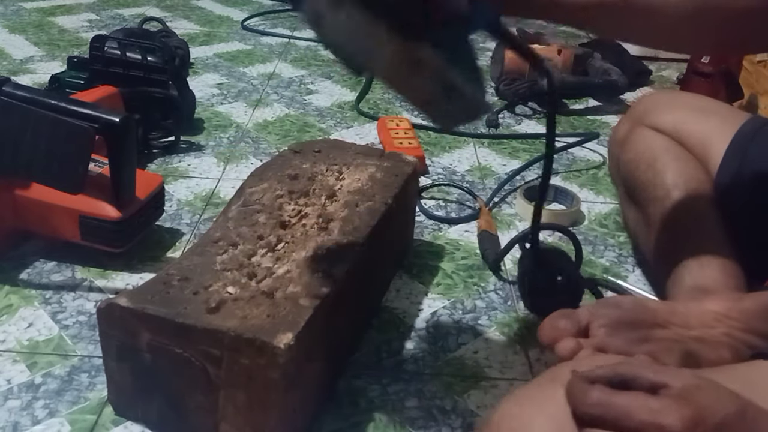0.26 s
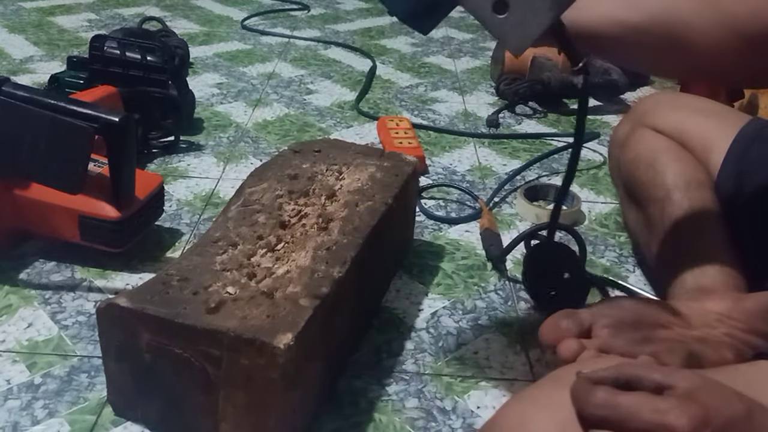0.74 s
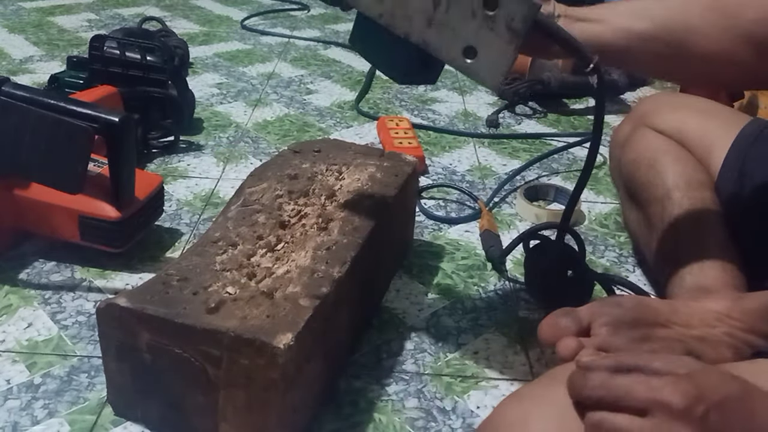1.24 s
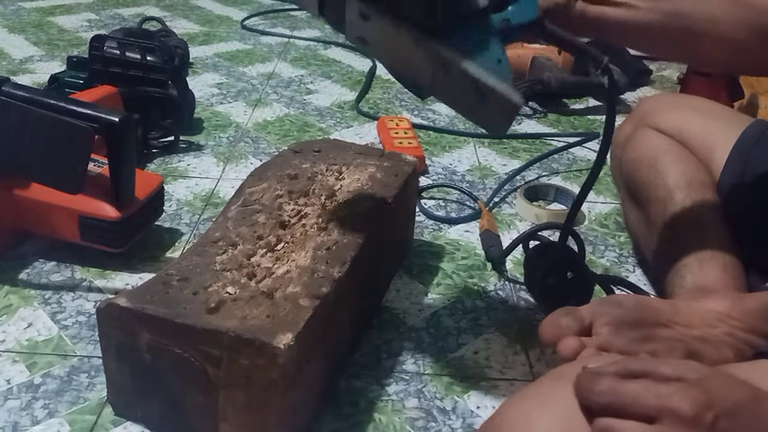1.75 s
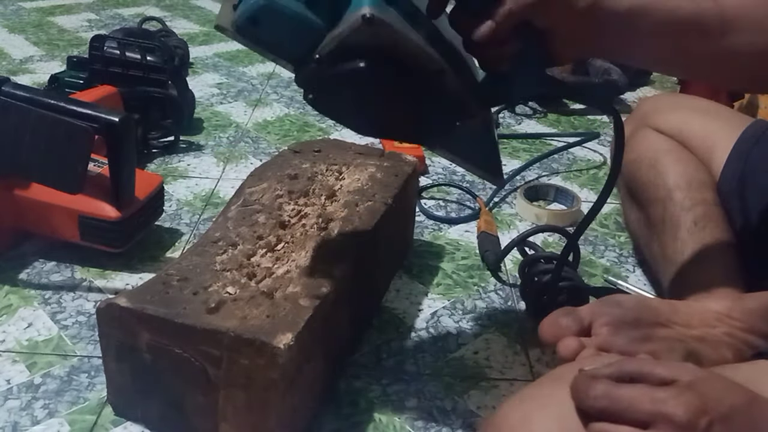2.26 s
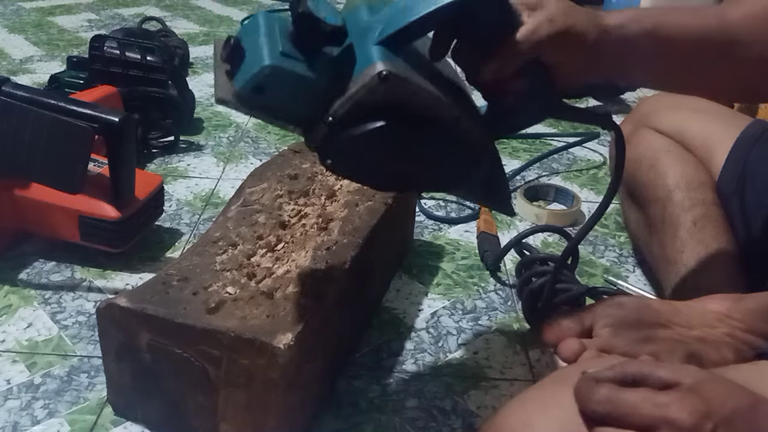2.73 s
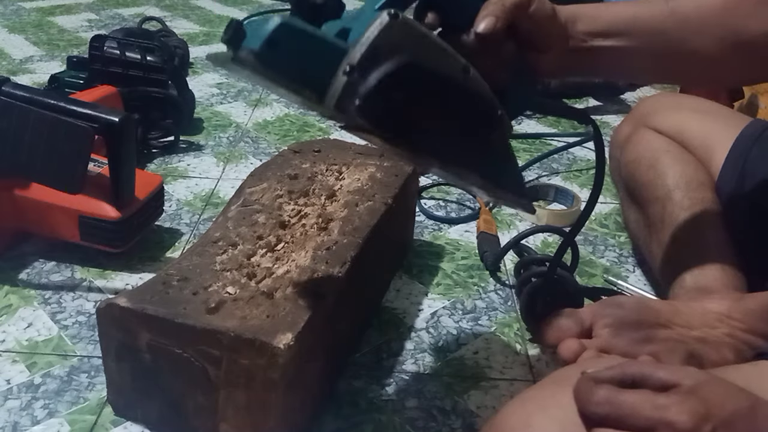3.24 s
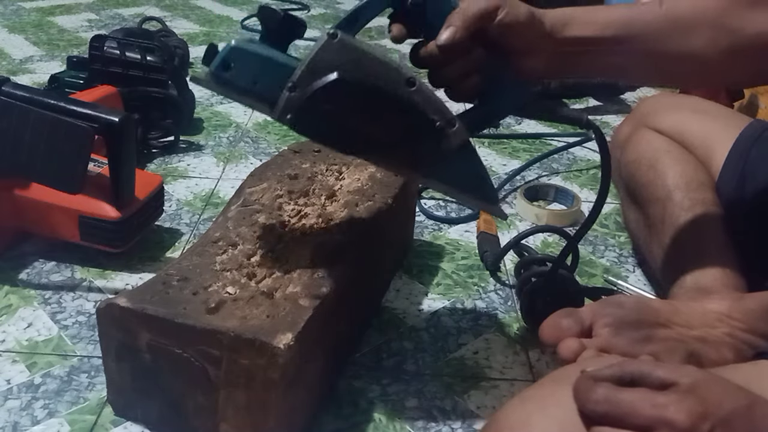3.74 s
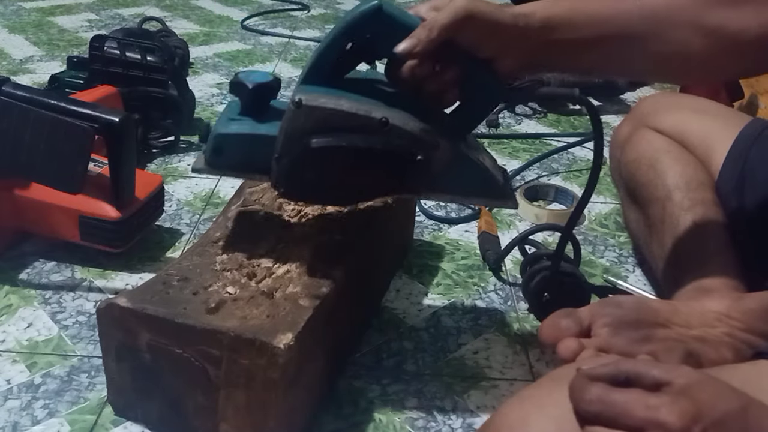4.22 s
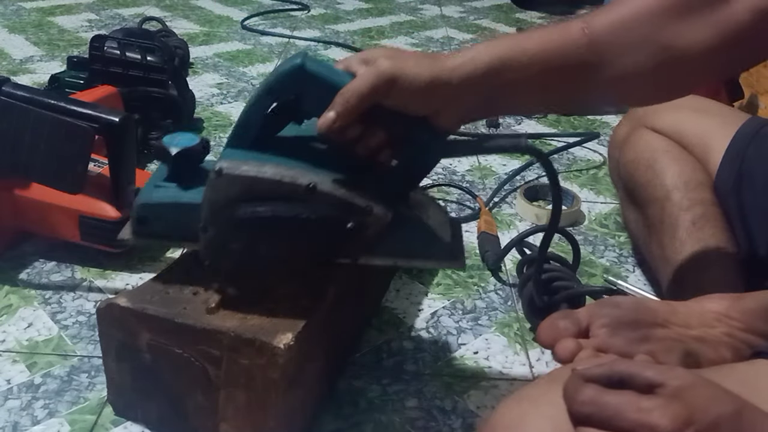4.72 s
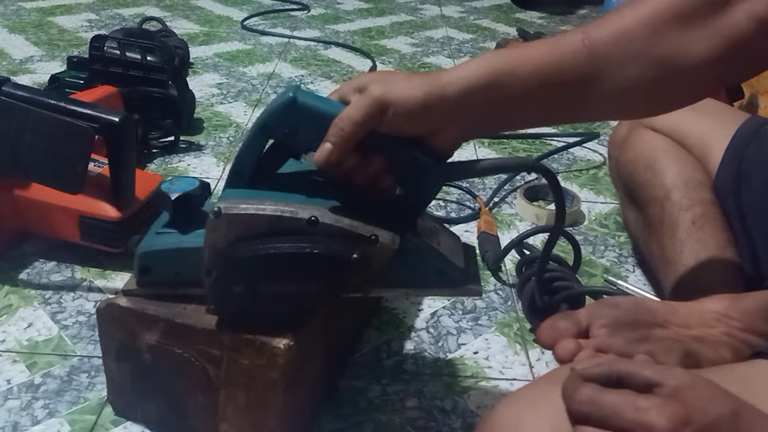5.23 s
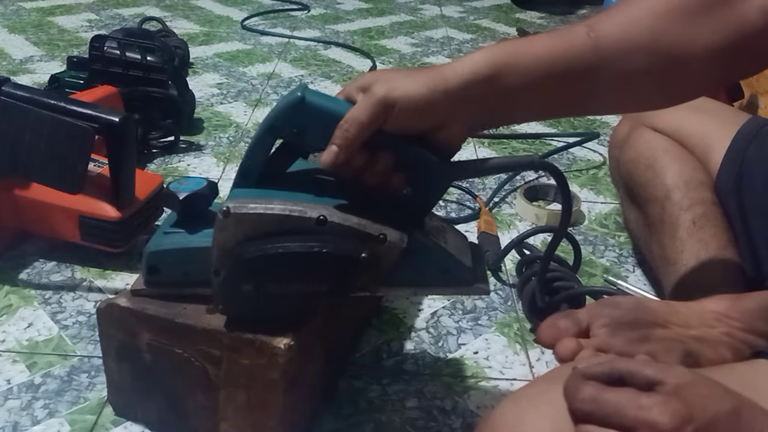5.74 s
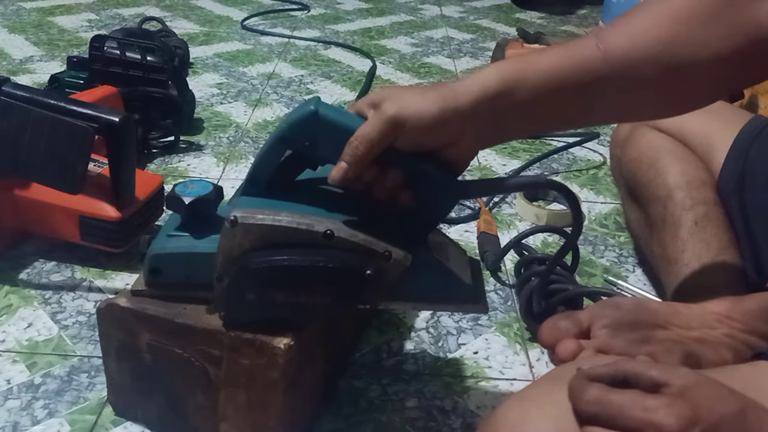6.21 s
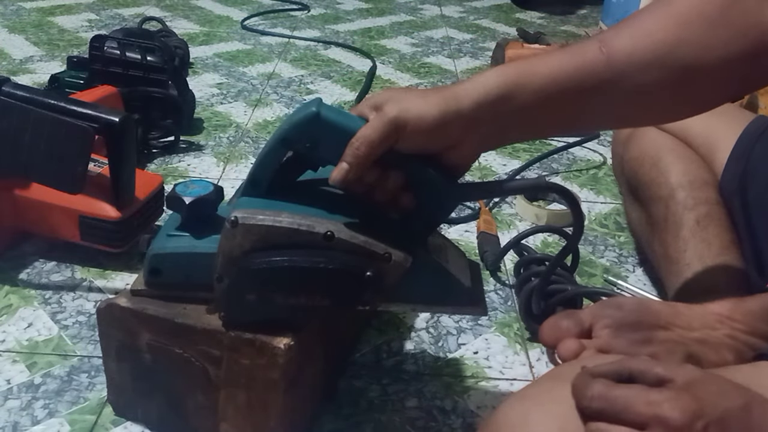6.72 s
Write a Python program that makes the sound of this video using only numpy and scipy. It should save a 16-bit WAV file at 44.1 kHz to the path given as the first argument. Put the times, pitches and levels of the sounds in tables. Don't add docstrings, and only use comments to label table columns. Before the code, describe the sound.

An electric hand planer is heard about a metre away in stereo, in a tiled room with a short reverberation. At 0 s it is already spinning and still gaining speed, with several hard, clicky belt knocks in the first 0.4 s. The pitch rises quickly, then creeps to a steady buzzing whine near 600 Hz with strong harmonics, a thin whine around 6 kHz and a broad rush of air. From 1 to 3.9 s the speed holds, while tones and air shift in strength and colour as the tool turns. At about 3.9 s it is switched off; the whine glides steadily down, swelling and beading, over hissing air and a ringing casing rattle. Single knocks come near 5 s, with faint scuffs on wood at 5.3 and 5.9 s. From 6 to 6.9 s dry clacks cluster over a low, slowing whirr, still turning at the end.

```python
import sys
import numpy as np
from scipy import signal
from scipy.fft import rfft, irfft, next_fast_len
from scipy.io import wavfile
from scipy.ndimage import uniform_filter1d

SR = 44100
rng = np.random.default_rng(int(sys.argv[2]) if len(sys.argv) > 2 else 0)


def undo_db(level):
    steps = np.asarray(level, float) / 20
    return 10 ** steps


def put_to_file(sound):
    columns = np.atleast_2d(sound).T
    safe = np.clip(columns, -1, 1)
    whole_steps = np.round(safe * 32767)
    wavfile.write(sys.argv[1], SR, whole_steps.astype(np.int16))


N = 307377
PAD = next_fast_len(N)
HZ = np.fft.rfftfreq(PAD, 1 / SR)

FULL_HZ, SLOT_ORDER, BELT_ORDER = 603.9, 10.61, 0.172
SWITCH_OFF_S = 3.92


def level(x, db):
    return x * undo_db(db) / np.sqrt(np.mean(x ** 2))


def columns(table):
    s, *rest = np.transpose(table)
    return [np.interp(np.arange(N) / SR, s, c) for c in rest]


def along(table, hz):
    points_hz, values = np.array(table).T
    return np.interp(np.log(hz + 1), np.log(points_hz), values)


def filtered(x, gain):
    return irfft(rfft(x, PAD) * gain, PAD)[..., :N]


def walk(rate):
    hold = int(SR / rate)
    coarse = np.repeat(rng.standard_normal(N // hold + 1), 8)
    coarse = uniform_filter1d(uniform_filter1d(coarse, size=8), size=8)
    return 1.3 * np.interp(np.arange(N) * 8 / hold, np.arange(len(coarse)), coarse)


def knife_rate(t):
    quick_hz, quick_s, slow_hz, slow_s, creep_hz_per_s = 39.3, 0.284, 124.9, 0.947, 1.2
    friction_hz, coast_s, belt_slip_hz, belt_slip_s = 388, 5.291, 6.0, 0.237
    on = np.minimum(t, SWITCH_OFF_S)
    off = np.maximum(t - SWITCH_OFF_S, 0)
    up = FULL_HZ - quick_hz * np.exp(-on / quick_s) - slow_hz * np.exp(-on / slow_s) + creep_hz_per_s * on
    coasting = (up + friction_hz) * np.exp(-off / coast_s) - friction_hz
    return coasting - belt_slip_hz * (1 - np.exp(-off / belt_slip_s))


def partial_levels(t, hz, near_db):
    speed_power, unpowered_db = 3.16, -1.5
    orders = (.5, 1, 2, 3, 4, 5, 6, 10.62)
    partial_db = [-55.5, -32.5, -26, -42.5, -46.5, -54.5, -52.5, -38.5]
    # frequency in Hz, gain in dB.
    outlet = [(200, 3), (500, -6.5), (900, -8), (1400, -12), (2100, 22.5), (2900, 10.5), (3500, 1),
              (6000, -11.5)]
    # centre in seconds, half length in seconds, gain in dB.
    sweeps = [
        [(1.95, .3, -14)],
        [(.1, 0.062, 6.5), (.185, 0.027, -12), (.75, 0.029, -10), (.92, .08, 10), (1.8, 0.38, 7),
         (2.73, 0.18, -10.5)],
        [(1.27, 0.04, 6), (2.44, 0.31, -8), (3.44, 1.0, 3.5)],
        [(.25, 0.47, 12), (.85, 0.03, -12.3), (1.51, 0.56, 8), (2.6, .14, 4.5), (3.32, .1, -8),
         (3.59, 0.1, -7.5)],
        [(.02, 0.045, -5), (.48, .12, 1.5), (1.27, 0.13, 5), (1.69, 0.51, -4.5), (2.28, 0.078, -12),
         (2.84, 0.083, -9), (3.1, 0.1, 2.5), (3.33, 0.083, -5.5)],
        [(.15, .12, 7.3), (1.24, 0.89, 10), (1.97, .13, -16)],
        [(1.63, 0.27, 9)],
        [(0.146, .17, 11.5), (1.1, 0.64, 4.5)],
    ]
    # centre in seconds, half length in seconds, gain in dB.
    crossings = [
        [(5.3, .15, 3), (5.6, 1.0, 12), (6.15, .1, 10)],
        [(4.13, .03, -2), (4.25, .1, 3), (4.33, .03, -8), (4.75, .3, 7.5), (5.13, 0.062, -12), (5.4, 0.11, 2)],
        [(4.1, 0.033, -2), (4.83, 0.063, -14), (5.1, 0.056, 8), (5.59, 0.34, 14), (5.62, .03, -2.5)],
        [(4.1, .05, -5), (4.35, .15, 6), (5.75, 0.93, 22.5), (5.42, .05, -10), (5.9, .05, -10),
         (6.07, 0.091, 11)],
        [(3.93, 0.096, -9), (4.22, 0.081, -13), (4.38, .1, -7), (4.55, 0.091, 3), (5.0, 0.1, 8)],
        [(4.25, 0.22, 1), (5.0, .22, 13.5)],
        [(4.6, .15, -8.5), (5.45, 0.17, 0)],
        [(4.6, .4, -5)],
    ]
    common = near_db + speed_power * 20 * np.log10(hz / FULL_HZ)
    common = common + unpowered_db * np.clip(10 * (t - SWITCH_OFF_S), 0, 1)
    levels = []
    for order, db, sweep, crossing in zip(orders, partial_db, sweeps, crossings):
        passing = sum(gain * np.exp(-((t - s) / half) ** 2) for s, half, gain in sweep + crossing)
        levels.append(common + db + along(outlet, order * hz) + passing)
    return levels


def tone(turns, db, order, flutter_db=1.0, spread=0.34):
    angle = 2 * np.pi * order * turns + 0.22 * walk(60)
    opposite = spread * np.sqrt(order) * (0.7 + 0.5 * walk(2.8)) * np.cos(angle)
    block = 4096
    glide = np.abs(np.gradient(np.gradient(turns[::block]))) * (SR / block) ** 2
    gliding = np.interp(np.arange(N) / block, np.arange(len(glide)), np.clip(glide / 150, 0, 1))
    beads_db = 3 * gliding * walk(16)
    loudness = np.sqrt(2) * undo_db(db + beads_db + flutter_db * walk(40))
    return loudness * (np.sin(angle) + np.array([opposite, -opposite]))


def knives(turns, harmonics_db, drum_db):
    # multiple of the knife rate, level against harmonic 6 in dB.
    overtones = [(8, -5), (10, -6)]
    out = tone(turns, drum_db, 1 / 2)
    for k, db in enumerate(harmonics_db):
        out = out + tone(turns, db, k + 1)
    for order, db in overtones:
        out = out + tone(turns, uniform_filter1d(harmonics_db[-1], SR // 2) + db, order)
    return out


def armature(turns, slot_db):
    motor_order = 0.885
    sides_db = slot_db - 6 + 2 * np.array([walk(3), walk(3)])
    sides = sum(tone(turns, db, SLOT_ORDER + k * BELT_ORDER) for k, db in zip((-1, 1), sides_db))
    shaft_db = uniform_filter1d(slot_db, SR // 2) - 14
    return tone(turns, slot_db, SLOT_ORDER) + sides + tone(turns, shaft_db, motor_order)


def wide_noise():
    # frequency in Hz, left-right likeness from 0 to 1.
    likeness = [(60, 0.9), (130, 1), (290, 1), (640, 0.32), (1410, 0.06), (3100, 0.17), (6820, 0),
                (15000, 0.01)]
    shared, left, right = rng.standard_normal((3, N))
    alike = np.clip(along(likeness, HZ), 0, 1) ** 0.5
    return filtered(shared, np.sqrt(alike)) + filtered(np.array([left, right]), np.sqrt(1 - alike))


def rush(turns, low_db, port_db, hiss_db):
    # frequency in Hz, density in dB per Hz.
    air_colour = [(30, -66), (60, -45), (130, -29), (290, -16.5), (480, -12.5), (600, -2), (850, -3),
                  (1200, -6.5), (1600, -6), (2300, 0), (3000, -10), (4000, -17), (7100, -20), (8500, -21)]
    # frequency in Hz, gain in dB.
    block_colour = [(1000, 1), (1130, -2), (1300, 9), (1700, -6), (1950, 2), (2250, 2.5), (2500, -2),
                    (3200, -9)]
    lowered_s, lowering_s = 4.14, 0.64
    air = rfft(wide_noise(), PAD) * undo_db(along(air_colour, HZ))
    flows = np.zeros((4, 2, N))
    for centre in 40 * 2 ** np.arange(0, 9.5, 0.5):
        share = np.clip(1 - 2 * np.abs(np.log2((HZ + 1) / centre)), 0, 1)
        flicker = undo_db(0.71 * walk(20))
        flows[np.searchsorted((950, 3250, 8000), centre)] += flicker * irfft(air * share, PAD)[:, :N]
    lowered = np.clip((np.arange(N) / SR - lowered_s) / lowering_s, 0, 1)
    port = (1 - lowered) * flows[1] + lowered * filtered(flows[1], undo_db(along(block_colour, HZ)))
    chop = 1 + 0.14 * np.cos(2 * np.pi * turns)
    gust = undo_db(0.79 * walk(30))
    fine = level(flows[3] * undo_db(0.74 * hiss_db), -42.5)
    hiss = undo_db(hiss_db) * level(flows[2], -1.27)
    low = undo_db(low_db) * level(flows[0], 0)
    return low + gust * chop * undo_db(port_db) * level(port, 0) + gust ** 0.4 * hiss + fine


def resonances(modes, hz):
    return sum(undo_db(db) / np.sqrt(1 + (2 * (hz - centre) / width) ** 2) for centre, width, db in modes)


def housing(turns, ring_db):
    # mode frequency in Hz, width in Hz, gain in dB.
    casing_modes = [(447, 15, -8.5), (700, 38, -16), (1278, 24, 3.5), (1524, 46, -2.5), (1970, 72, -1),
                    (2220, 120, -8), (2720, 65, -3), (3010, 100, -11), (3540, 100, -13), (4770, 160, -14),
                    (7070, 520, -14.5)]
    swell = 1 + 0.73 * np.cos(2 * np.pi * BELT_ORDER * turns)
    chatter = swell * undo_db(2.1 * walk(40)) * wide_noise()
    return undo_db(ring_db) * level(filtered(chatter, resonances(casing_modes, HZ) ** 1.223), 0)


def belt():
    # time in seconds, peak in dB, low housing mode in dB, pitch of the upper mode in Hz.
    knocks = [(.094, -15, -32, 2310), (.1053, -15.5, -44, 2300), (.1532, -18, -37, 2270),
              (.2367, -14, -34, 2440), (.3655, -16, -23, 2030), (4.9592, -19.5, -39, 2210),
              (5.1278, -23, -31, 2100), (5.5365, -23, -37, 2260), (5.8161, -21, -50, 2140),
              (5.8559, -24, -45, 2210), (5.8915, -25, -30, 2140), (6.055, -21, -38, 2264),
              (6.1239, -23, -38, 2250), (6.1958, -23, -39, 2220), (6.2142, -20.5, -19.5, 2140),
              (6.2391, -20, -22, 2130), (6.2601, -26, -25, 2078), (6.2812, -22, -21, 2090),
              (6.3039, -20.5, -30, 2210), (6.333, -24, -20.5, 2130), (6.3856, -24, -26, 2110),
              (6.5367, -20, -49, 2240), (6.5619, -19.5, -52, 2140), (6.5876, -21, -48, 2220),
              (6.7115, -21, -36, 1970), (6.7441, -18, -20.5, 2210), (6.7745, -15.5, -31, 2230),
              (6.8067, -15, -48, 2200), (6.8381, -18, -41, 2130), (6.898, -27, -22, 2150)]
    low_mode_hz, knock_s, turn_share = 1282, 0.0029, 0.18
    half = 2048
    out = np.zeros((2, N + 2 * half))
    t = (np.arange(2 * half) - half) / SR
    for (s, db, low_db, hz), (a, b, c) in zip(knocks, rng.random((len(knocks), 3))):
        i = int(s * SR)
        length = knock_s + turn_share / (BELT_ORDER * knife_rate(s))
        scrape = np.exp(-(t / (length * np.where(t < 0, 0.75, 0.45))) ** 2)
        upper = np.sin(2 * np.pi * (hz * t + a)) + 0.19 * np.sin(2 * np.pi * (1.27 * hz * t + b))
        lower = np.exp(-(t / 0.016) ** 2) * np.sin(2 * np.pi * (low_mode_hz * (t + i / SR) + c / 10))
        knock = undo_db(db - 2.0) * scrape * upper + undo_db(low_db - 8.5) * lower
        out[:, max(i - half, 0):i + half] += knock[max(half - i, 0):]
    return out[:, :N]


def scuffs():
    # centre in seconds, length in seconds, frequency in Hz, level in dB.
    scrapes = [
        (5.34, 0.041, 3420, -36.5),
        (5.854, 0.057, 2900, -34.5),
    ]
    out, t = np.zeros((2, N)), np.arange(N) / SR
    grit = rng.standard_normal((2, N)) * undo_db(3 * walk(150))
    for s, length, hz, db in scrapes:
        near = np.abs(t - s) < 2 * length
        bandpass = signal.butter(2, (hz / 1.14, hz * 1.1), "band", fs=SR, output="sos")
        band = signal.sosfilt(bandpass, grit[:, near])
        out[:, near] += level(band, db) * np.exp(-((t[near] - s) / length) ** 4)
    return out


def room(x):
    t60_s, tail_db = 0.16, -7
    t = np.arange(SR // 2) / SR
    tail = rng.standard_normal((2, len(t))) * np.exp(-np.log(1000) * t / t60_s) * (t > 0.004)
    tail = tail / np.sqrt(np.sum(tail ** 2) / 2)
    return x + undo_db(tail_db) * signal.fftconvolve(x, tail, axes=1)[:, :N]


def scene():
    # time in seconds, loudness of the air in dB, chip port facing the listener in dB,
    # left minus right in dB.
    hand = [(0.0, -30.5, 3.5, -0.5), (.17, -30, 3.5, 1.5), (.39, -31, 1.5, 0.5), (.54, -33.5, 4.5, 0.5),
            (1.14, -33, 5, 1), (1.38, -35, 5.5, 2), (1.57, -37, 6, 2.5), (1.9, -36.5, 4.5, -0.5),
            (2.29, -34.5, 5.5, 0.5), (2.5, -34.5, 7.5, 2.5), (2.83, -34.5, 7, 0), (3.16, -34.5, 7, 1.5),
            (3.32, -35.5, 5.5, 1.5), (3.8, -36, 7.5, 2), (3.96, -35, 6.5, 1), (4.15, -37.5, 7, .5),
            (5.43, -38.5, 2.5, 1.5), (6.6, -38, 4.5, 1.5)]
    # knife rate in Hz, level in dB.
    ring = [(165, -32), (230, -32), (350, -33), (440, -34.5), (480, -30), (530, -32), (570, -38.5),
            (607, -39)]
    near_db, on_block_db = -35.5, -5
    low_air_db, low_speed_power, low_port_share = -8, 0.19, 0.31
    t = np.arange(N) / SR
    hz = knife_rate(t)
    turns = np.cumsum(hz) / SR
    air_db, facing_db, pan_db = columns(hand)
    drum_db, *harmonics_db, slot_db = partial_levels(t, hz, air_db - near_db)
    low_db = air_db + low_air_db + low_port_share * facing_db
    low_db = low_db + low_speed_power * 20 * np.log10(hz / FULL_HZ)
    ring_db = along(ring, hz) + on_block_db * np.exp(-((t - 4.5) / 0.22) ** 2)
    tones = knives(turns, harmonics_db, drum_db) + armature(turns, slot_db)
    noise = rush(turns, low_db, air_db + facing_db, air_db) + housing(turns, ring_db)
    return (tones + belt() + room(noise + scuffs())) * undo_db(np.array([pan_db, -pan_db]) / 2)


def low_pass(x):
    return signal.sosfilt(signal.butter(12, 15830, fs=SR, output="sos"), x)


def record(dry):
    # frequency in Hz, gain in dB.
    capsule = [(8500, -0.5), (9200, -1.5), (9750, -7), (11300, -1.5), (12300, -10), (13600, -3),
               (14300, -11), (15000, -9), (15450, -4)]
    # frequency in Hz, left minus right in dB.
    lean = [(60, -0.5), (700, -0.5), (2400, 0.5), (4000, 0), (7000, -7.5), (9000, 4), (12000, 2),
            (15000, -10.5)]
    bass_cut_hz, top_hz = 69, 15500
    edges = (HZ < top_hz) / np.sqrt(1 + (bass_cut_hz / (HZ + 1)) ** 6)
    ports = undo_db(along(capsule, HZ) + np.array([[0.5], [-0.5]]) * along(lean, HZ))
    return low_pass(filtered(dry, edges * ports))


dry = scene()
out = record(dry)
put_to_file(out)
```